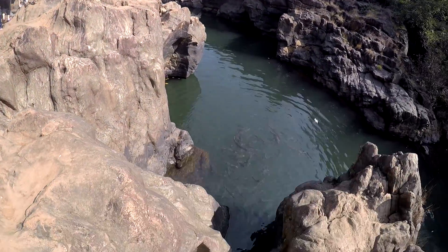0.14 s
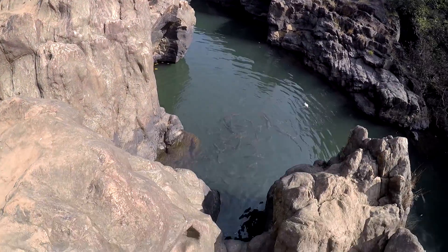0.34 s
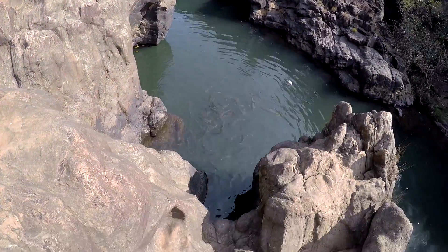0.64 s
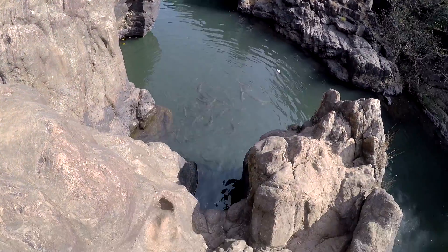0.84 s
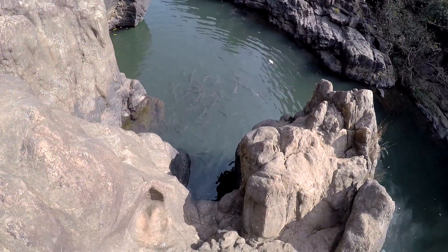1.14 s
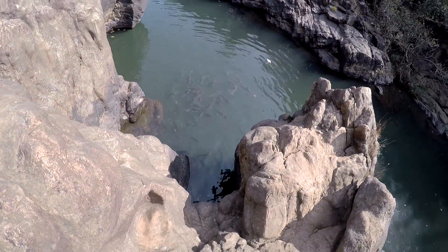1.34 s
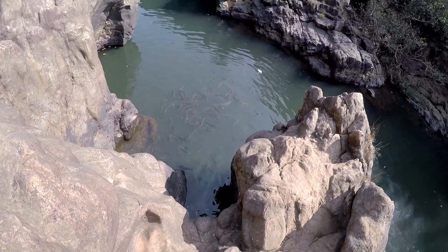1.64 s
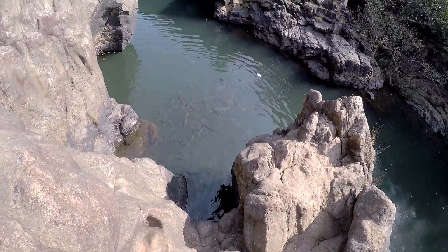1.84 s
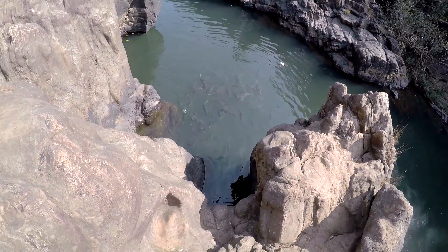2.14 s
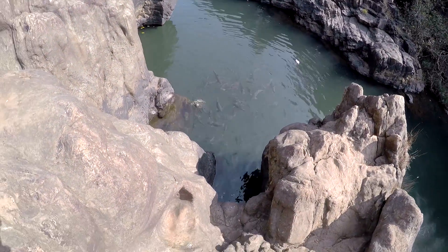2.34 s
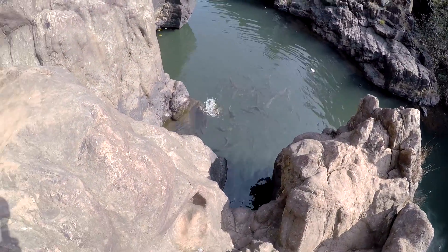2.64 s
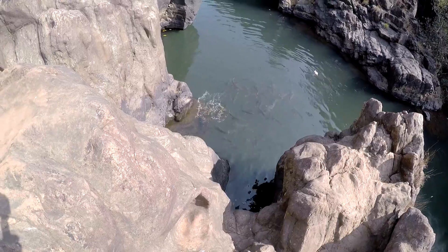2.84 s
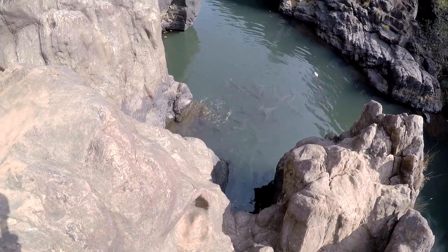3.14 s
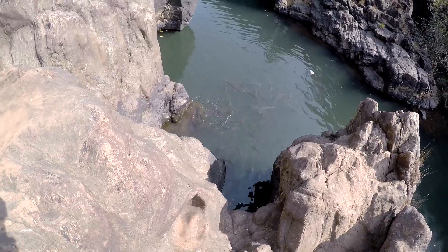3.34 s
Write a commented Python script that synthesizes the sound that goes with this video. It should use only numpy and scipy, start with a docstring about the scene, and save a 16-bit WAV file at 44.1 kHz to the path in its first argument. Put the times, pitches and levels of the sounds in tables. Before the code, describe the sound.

A short splash of fish, heard from rocks above a river pool, follows scattered little slaps and plops and ends in falling drops. Low wind rumble on the microphone and faint flowing water continue throughout, with thin bird ticks.

```python
"""Fish thrash in a river pool, heard from the rocks above.
From the start, wind rumbles on the microphone and the river washes faintly. A few small slaps and
gulps of trapped air follow, and from 1.3 s a small bird calls and ticks between the rock walls.
At 2.5 s comes the one splash: a crack, then deep air pockets ringing, then spray pattering back.
The spray is gone by 3.3 s, and the bird ticks once more."""
import sys
import numpy as np
from scipy import signal
from scipy.fft import rfft, irfft
from scipy.io import wavfile
from scipy.ndimage import uniform_filter1d

SR = 44100
rng = np.random.default_rng(int(sys.argv[2]) if len(sys.argv) > 2 else 0)


def bounce(signal):
    """Save signal as a 16-bit WAV file at the path given by the first command-line argument."""
    frames = np.transpose(np.atleast_2d(signal))
    limited = np.clip(frames, -1, 1)
    pcm = np.round(limited * 32767).astype(np.int16)
    wavfile.write(sys.argv[1], SR, pcm)


N = 154791
TIME = np.arange(N) / SR

# Tone of the wind, from low to high: frequency_hz, relative_db
WIND_TONE = [(10, -23.5), (20, -6), (31, 2.5), (45, 0.5), (56, -6.5), (68, 0.5), (82, -10), (100, -16.5),
             (115, -16.5), (150, -23), (200, -31), (400, -70)]
# How loud the wind is: time_s, level_db
WIND_LEVEL = [(0, -34), (.6, -36), (1.1, -35), (1.21, -40.5), (1.4, -38), (1.7, -38), (1.95, -34.5),
              (2.2, -37.5), (2.6, -36), (3.0, -37), (3.5, -35.5)]
# Tone of the river's wash: frequency_hz, relative_db
RIVER_TONE = [(100, -46), (170, -7.5), (234, -1.5), (353, -1.5), (514, -8.5), (747, -18), (954, -18.5),
              (1150, -24.5), (1440, -24.5), (2850, -24.5), (3450, -27.5), (5250, -27.5), (6400, -31),
              (7000, -32), (9210, -35.5), (13300, -38), (15000, -45)]
# How the river's treble rises and falls: time_s, boost_db
RIVER_TREBLE = [(0, 3), (.1, -2.5), (1.6, 0.5), (3.0, 0), (3.5, 3.5)]
# Bird ticks, each with a lower note (the hook): start_s, level_db, top_pitch_hz, hook_relative_db
BIRD_TICKS = [(1.579, -69, 6700, -17), (1.651, -69, 6700, -20), (1.724, -68, 6740, -15),
              (1.773, -52.5, 6600, 0.5), (2.380, -54, 6540, -6), (2.530, -51.5, 6550, -17),
              (2.598, -48.5, 6900, -8), (2.675, -52, 6520, -4), (2.765, -46.5, 6600, -6),
              (3.045, -49, 6670, -1.5), (3.432, -51.5, 6680, -3.5)]
# Tone of the fizz in a tick: frequency_hz, relative_db
FIZZ_TONE = [(2000, -28), (4000, -3), (6000, -3.5), (7700, -0.5), (9000, -19), (12500, -14), (15000, -22)]
# Two longer bird calls, each a list of points: time_s, pitch_hz, level_db
BIRD_SLIDES = [
    [(1.288, 5050, -71), (1.298, 6500, -65), (1.313, 6580, -72), (1.328, 5320, -60), (1.356, 4000, -68)],
    [(2.125, 6670, -75), (2.155, 6600, -73), (2.185, 6600, -78.5)],
]
# How loud the falling spray is: time_s, level_db
SPRAY_LEVEL = [(2.48, -66.5), (2.53, -60.5), (2.58, -54.5), (2.66, -56), (2.71, -52), (2.80, -54),
               (2.89, -56), (2.99, -59), (3.08, -67.5), (3.16, -65.5), (3.3, -90)]
# Tone of the spray's patter: frequency_hz, relative_db
SPRAY_TONE = [(240, -61), (400, 5), (518, -7.5), (701, -7), (1590, -12), (3050, -7), (4530, -12.5),
              (6130, -18.5), (8180, -26.5), (15000, -29)]
# Large drops landing: start_s, level_db, pitch_hz
DRIPS = [(2.549, -50, 1530), (2.578, -49, 2870), (2.607, -50, 1740), (2.696, -45, 2930),
         (2.7205, -43, 2250), (2.779, -48, 810), (2.794, -46, 960), (2.826, -48, 830), (2.826, -49, 2680),
         (2.836, -49, 3170), (2.919, -50, 1190), (2.942, -50, 2870), (3.0, -48, 2910), (3.028, -53, 3950)]
# Large pockets of trapped air: start_s, level_db, pitch_hz, decay_s
AIR_POCKETS = [(.825, -49, 340, .015), (.842, -47, 437, 0.058), (2.062, -40.5, 354, .018),
               (2.07, -48, 477, 0.0096), (2.503, -31, 356, .023), (2.556, -36, 403, 0.0076),
               (2.562, -44, 518, .0055), (2.69, -49, 511, 0.014), (2.81, -51, 611, 0.01),
               (2.869, -43, 736, .0053), (3.045, -48.5, 257, 0.076)]
# Slaps and small ticks on the water: start_s, level_db, centre_hz, width_octaves, decay_s
SLAPS = [(0.2976, -44.5, 1160, 0.53, .0013), (.328, -56, 2850, .15, 0.0051), (.3285, -49, 520, 0.72, .008),
         (.333, -53, 2930, 0.32, 0.0068), (.648, -57, 5900, .25, .004), (1.144, -60, 7500, 0.73, .005),
         (1.5055, -51.5, 720, 0.59, .004), (1.506, -56.5, 3900, .5, .0035),
         (1.761, -54.5, 5100, 0.35, 0.0075), (1.7825, -50.5, 12800, .25, .0018),
         (1.783, -52, 5400, .45, .003), (1.890, -50.5, 2310, 0.75, 0.0027),
         (1.898, -49.5, 890, 1.4, 0.0036), (1.9975, -48, 1700, 1.1, 0.0013),
         (2.0574, -45.5, 2360, 0.54, 0.002), (2.253, -48.5, 2220, 0.67, 0.0024),
         (2.276, -60, 6740, .2, .015), (2.444, -52.5, 1290, .96, .003), (2.496, -42, 2950, .21, 0.0047),
         (2.503, -43, 1100, 1.1, 0.0038), (2.504, -46, 3150, 0.15, 0.0027),
         (2.538, -49.5, 1070, 0.51, .0077), (2.556, -50.5, 620, 0.95, 0.006),
         (2.596, -60, 11000, 0.47, 0.0079), (2.628, -48, 1190, .8, 0.006), (2.696, -48, 3000, 0.27, 0.0069),
         (2.7734, -49, 2020, 0.89, 0.012), (2.9283, -46, 1700, .9, .0055), (3.146, -54.5, 1050, .7, .013),
         (3.3045, -46, 1210, 1.05, 0.0014)]

PLOP_RISE_CYCLES, PLOP_GLIDE = 1.13, .0305  # fade-in length; share of pitch gained per decay time


def amp(db):
    """Turns decibels into a number to multiply by."""
    return 10 ** (np.asarray(db) / 20)


def unit(x):
    """Scales a sound to an average strength (rms) of 1."""
    return x / np.sqrt(np.mean(x ** 2) + 1e-20)


def at_hz(points, hz):
    """Looks up a tone table, sliding between its points by octaves."""
    frequencies, db = np.transpose(points)
    return np.interp(np.log(hz + 1), np.log(frequencies + 1), db)


def at_time(points, t):
    """Looks up a time table, joining its points with straight lines."""
    return np.interp(t, *np.transpose(points))


def add(mix, start_s, sound):
    """Adds a sound to the mix at a given time."""
    part = mix[max(round(start_s * SR), 0):][:len(sound)]
    part += sound[:len(part)]


def colour(x, tone):
    """Filters a sound with a tone table and scales it to strength 1."""
    gains = amp(at_hz(tone, np.fft.rfftfreq(len(x), 1 / SR)))
    return unit(irfft(rfft(x) * gains, len(x)))


def wobble(length, smooth_samples):
    """A random wavering curve; more smoothing makes it slower."""
    return unit(uniform_filter1d(rng.standard_normal(length), size=smooth_samples))


def bubble(hz, decay_s, rise_s, glide):
    """Trapped air rings, and its pitch climbs as it nears the surface."""
    t = np.arange(0, 2 * np.pi * decay_s + rise_s, 1 / SR)
    fade_in = np.sin(np.pi / 2 * np.minimum(t / rise_s, 1)) ** 2
    fade_out = np.exp(-np.maximum(t - rise_s, 0) / decay_s)
    pitch_hz = hz * (1 + glide * t / decay_s)
    return fade_in * fade_out * np.sin(2 * np.pi * np.cumsum(pitch_hz) / SR)


def bubbling(per_s, low_hz, high_hz, decay_cycles, glide, spread_db):
    """A steady stream of bubbles, random in time, pitch and loudness."""
    out, tries = np.zeros(N), 3000
    for when, pitch, softness, ring, chance in rng.random((tries, 5)):
        if chance < per_s * N / SR / tries:
            hz = low_hz * (high_hz / low_hz) ** pitch
            decay_s = decay_cycles * (.5 + ring) / hz
            add(out, when * N / SR, amp(-spread_db * softness) * bubble(hz, decay_s, 1 / hz, glide))
    return unit(out)


def wind(evenness=.25):
    """Air buffets the microphone with a low, fairly even rumble."""
    rumble = colour(rng.standard_normal(N), WIND_TONE)
    gust_power = uniform_filter1d(uniform_filter1d(rumble ** 2, size=3000), size=3000)
    return amp(at_time(WIND_LEVEL, TIME)) * unit(rumble / gust_power ** (evenness / 2))


def river(wash_db=-56, gurgle_db=-63, treble_hz=960, bass_cut_hz=170):
    """Distant flowing water makes a faintly patchy wash with low gurgles."""
    hz, t, noise_grid = signal.stft(rng.standard_normal(N), SR, nperseg=1024, noverlap=768)
    hz = hz[:, None]  # the grid has a row per frequency and a column per moment
    patches = uniform_filter1d(rng.standard_normal(noise_grid.shape), size=12, axis=0)
    patches_db = unit(uniform_filter1d(patches, size=8, axis=1))
    treble_db = hz / (hz + treble_hz) * at_time(RIVER_TREBLE, t)
    bass_cut = np.minimum(hz / bass_cut_hz, 1) ** 2
    wash_grid = noise_grid * amp(at_hz(RIVER_TONE, hz) + patches_db + treble_db) * bass_cut
    wash = unit(signal.istft(wash_grid, nperseg=1024, noverlap=768)[1][:N])
    gurgles = bubbling(per_s=45, low_hz=250.3, high_hz=480.4, decay_cycles=7.8,
                       glide=PLOP_GLIDE, spread_db=14)
    return amp(wash_db) * wash + amp(gurgle_db) * gurgles


def rock_echoes(sound, delay_s=.005, fade_60db_s=.26, bass_cut_hz=505):
    """Sound bounces off the rock walls as short, scattered echoes with little bass."""
    t = np.arange(SR // 2) / SR
    bounces = rng.standard_normal(len(t)) * (rng.random(len(t)) < .1)
    bounces *= (t > delay_s) * amp(-60 * t / fade_60db_s)
    bounces = signal.sosfilt(signal.butter(2, bass_cut_hz, "high", fs=SR, output="sos"), bounces)
    return signal.fftconvolve(sound, bounces / np.linalg.norm(bounces))[:N]


def whistle(hz, waver=.017, rasp_db=-6.5):
    """The bird's voice: a slightly raspy, unsteady tone that follows a pitch curve."""
    pitch_hz = hz * (1 + waver * wobble(len(hz), 30))
    rasp = 1 + amp(rasp_db) * wobble(len(hz), 30)
    return rasp * np.sin(2 * np.pi * np.cumsum(pitch_hz) / SR)


def bird(sweep_s=.014, fizz_db=-11, hook_s=.011, hook_delay_s=.011, hook_top_hz=4730):
    """Each tick is a fast, fizzy upward sweep and a lower hook; two thin calls slide in pitch."""
    out = np.zeros(N)
    sweep_progress = np.arange(0, 1, 1 / (sweep_s * SR))
    hook_arch = np.sin(np.pi * np.arange(0, 1, 1 / (hook_s * SR)))
    hook_hz = hook_top_hz * (.75 + .25 * hook_arch)
    for start_s, db, top_hz, hook_db in BIRD_TICKS:
        fizz = colour(rng.standard_normal(len(sweep_progress)), FIZZ_TONE)
        fizz *= np.sin(np.pi * np.sqrt(sweep_progress))
        sweep_hz = top_hz * (.64 + .36 * np.sin(np.pi * .614 * sweep_progress))  # climbs, then dips
        sweep = np.sin(np.pi * sweep_progress) * whistle(sweep_hz)
        add(out, start_s, amp(db) * (sweep + amp(fizz_db) * fizz))
        add(out, start_s + hook_delay_s, amp(db + hook_db) * hook_arch * whistle(hook_hz))
    for times, hz, db in map(np.transpose, BIRD_SLIDES):
        t = np.arange(times[0], times[-1], 1 / SR)
        add(out, times[0], amp(np.interp(t, times, db)) * whistle(np.interp(t, times, hz)))
    return out


def spray(drops_per_s=1700, spread_db=3.5, mist_gain=.28, bubble_db=-5, clump_db=2.45, clump_s=.013):
    """Thrown water falls back in clumps, as a patter of drops and small bubbles."""
    sizes = amp(spread_db * np.minimum(rng.exponential(1, N), 4))
    signs = rng.choice([-1, 1], N)
    landings = rng.random(N) < drops_per_s / SR
    mist = mist_gain * rng.standard_normal(N)
    patter = colour(unit(sizes * signs * landings) + mist, SPRAY_TONE)
    bubbles = bubbling(per_s=170, low_hz=746, high_hz=4560, decay_cycles=9, glide=.0507, spread_db=20)
    clumps = amp(clump_db * wobble(N, round(clump_s * SR)))
    return amp(at_time(SPRAY_LEVEL, TIME)) * unit(clumps * patter + amp(bubble_db) * bubbles)


def drips(decay_s=.0033):
    """Single large drops plink as they land."""
    out = np.zeros(N)
    for start_s, db, hz in DRIPS:
        add(out, start_s, amp(db) * bubble(hz, decay_s, PLOP_RISE_CYCLES / hz, PLOP_GLIDE))
    return out


def air_pockets():
    """Large pockets of air ring under the water as deep gulps."""
    out = np.zeros(N)
    for start_s, db, hz, decay_s in AIR_POCKETS:
        add(out, start_s, amp(db) * bubble(hz, decay_s, PLOP_RISE_CYCLES / hz, PLOP_GLIDE))
    return out


def fish_slaps(rise_s=.00071):
    """Fish hit the surface; each slap is a quick burst of noise around one frequency."""
    out, t = np.zeros(N), np.arange(4096) / SR
    hz = np.fft.rfftfreq(len(t), 1 / SR)
    for start_s, db, centre_hz, width_octaves, decay_s in SLAPS:
        octaves_away = np.log2((hz + 1) / centre_hz)
        band = 1 / (1 + (octaves_away / width_octaves) ** 2 / 4) ** 4
        shape = np.minimum(t / rise_s, 1) * np.exp(-np.maximum(t - rise_s, 0) / decay_s)
        burst = irfft(rfft(rng.standard_normal(len(t))) * band) * shape
        add(out, start_s, amp(db) * unit(burst) * np.sqrt(np.mean(shape ** 2)))
    return out


def scene(water_echo_db=-10, bird_echo_db=-7):
    """Mixes the splashing, the bird and their echoes over river and wind, in one channel."""
    water = fish_slaps() + air_pockets() + drips() + spray()
    calls = bird()
    echoes = rock_echoes(amp(water_echo_db) * water + amp(bird_echo_db) * calls)
    return (water + calls + echoes + river() + wind())[None]


def record(dry):
    """Cuts away the highest treble, above 15300 Hz."""
    treble_cut = signal.firwin(511, 15300, window=("kaiser", 9), fs=SR)
    return signal.oaconvolve(dry, treble_cut[None], "same")


dry = scene()
out = record(dry)
bounce(out)
```